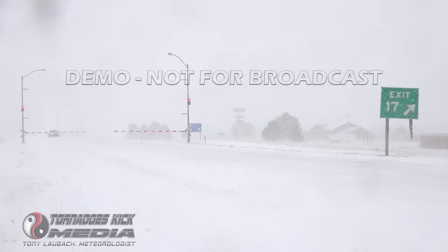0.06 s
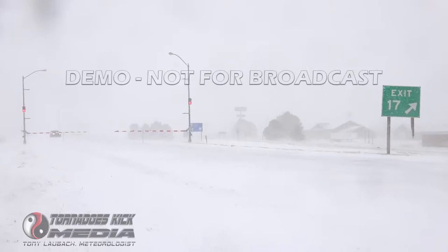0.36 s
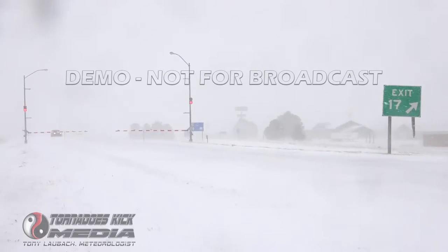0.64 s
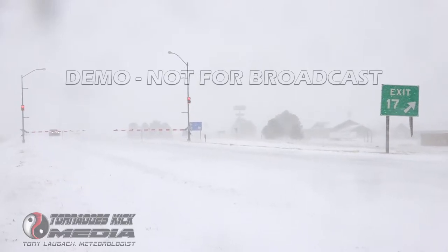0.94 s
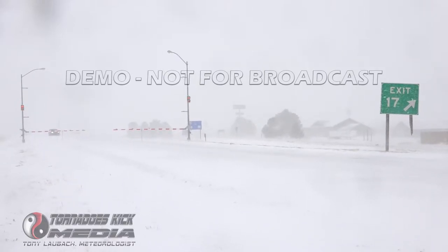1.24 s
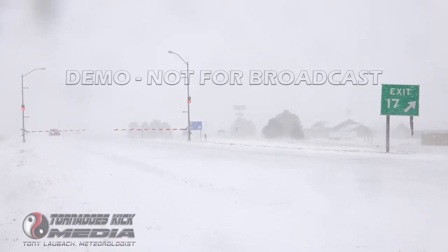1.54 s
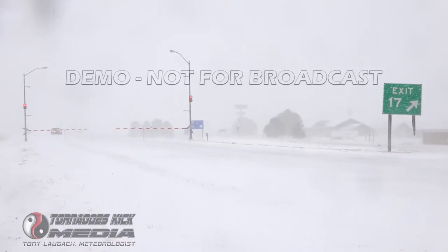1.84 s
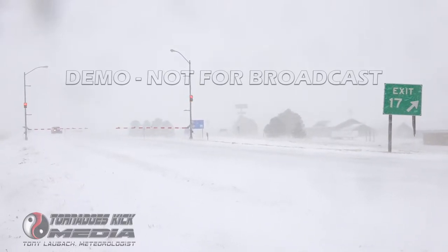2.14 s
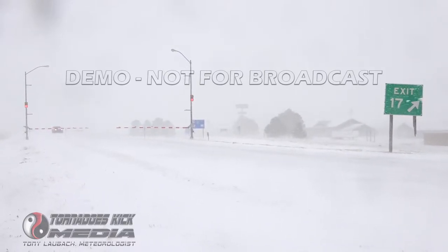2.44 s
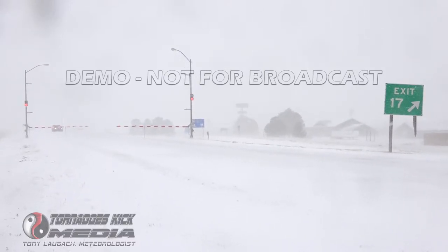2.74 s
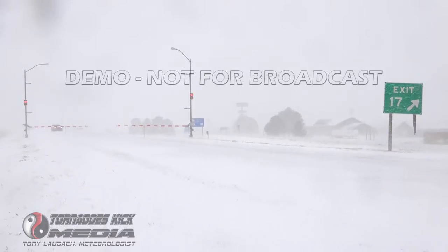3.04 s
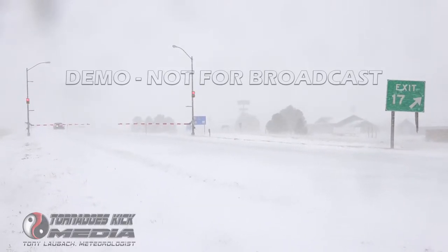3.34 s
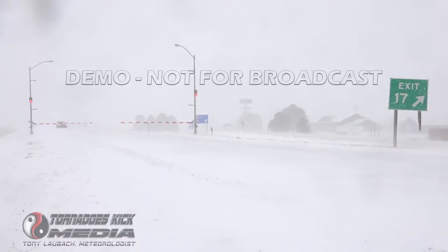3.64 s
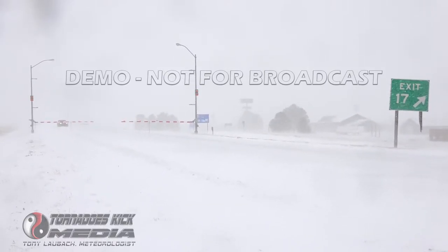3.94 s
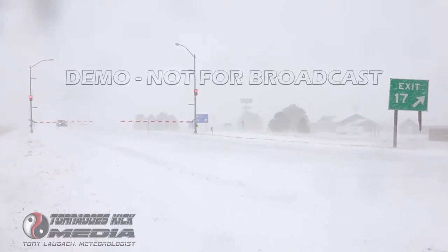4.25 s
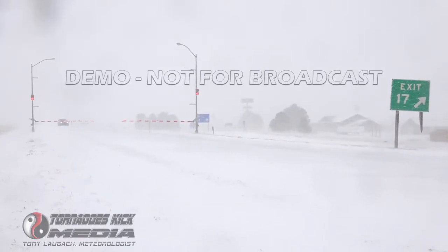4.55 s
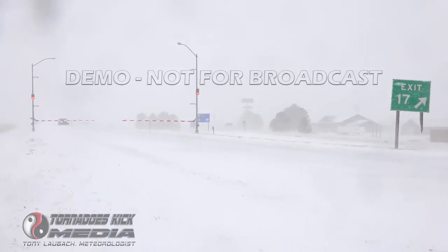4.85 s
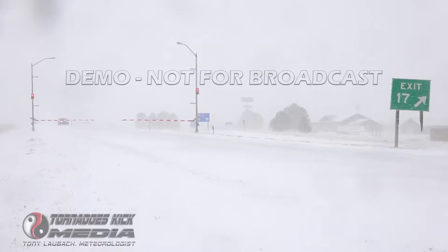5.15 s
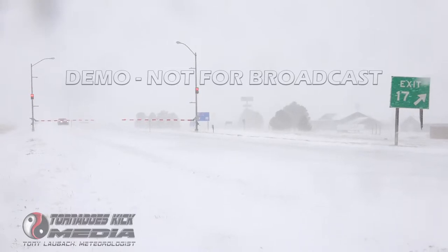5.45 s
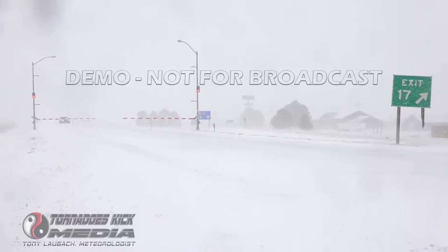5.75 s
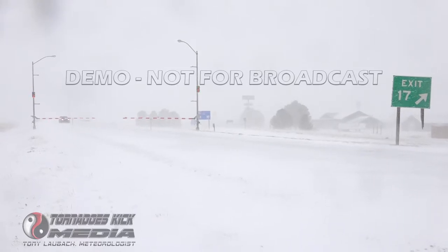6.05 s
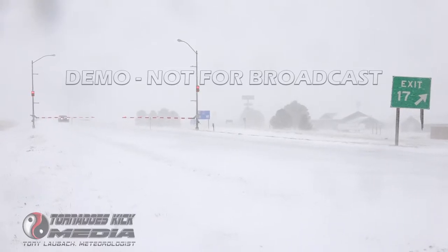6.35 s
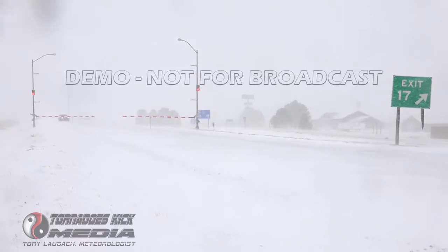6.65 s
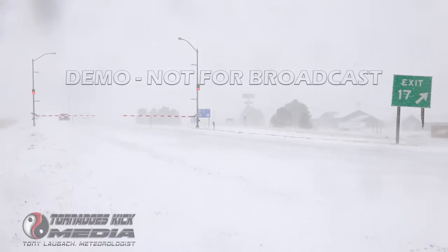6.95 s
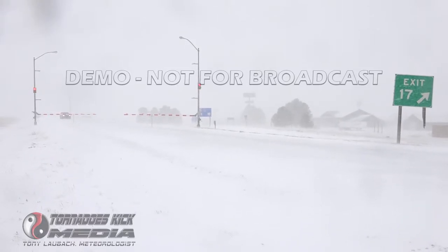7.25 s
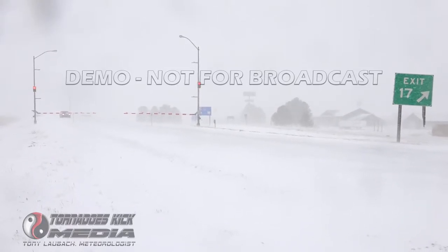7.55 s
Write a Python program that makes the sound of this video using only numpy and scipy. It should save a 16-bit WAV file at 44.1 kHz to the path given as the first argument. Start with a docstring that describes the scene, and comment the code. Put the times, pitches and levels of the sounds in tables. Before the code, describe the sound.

Strong, gusty wind rumbles and slaps against the microphone in a snowstorm, while blown snow lightly ticks and sizzles.

```python
"""A lumpy wind rumble, with gusts of roar and hiss: a blizzard blowing over a camera in the open.
Eddies buffet and slap the microphone, nearly alike in both channels and stronger on the right.
Air roars past the housing, whooshes at its edge, and spits and rasps through the grille.
Driven snow ticks on the housing and fine snow dust sizzles."""
import sys
import numpy as np
from scipy.fft import rfft, irfft, next_fast_len
from scipy.io import wavfile
from scipy.ndimage import uniform_filter1d, minimum_filter1d, map_coordinates

SR = 44100
rng = np.random.default_rng(int(sys.argv[2]) if len(sys.argv) > 2 else 0)


def dump(signal):
    """Clip the signal to [-1, 1] and save it as 16-bit WAV at the path in sys.argv[1]."""
    limited = np.clip(np.atleast_2d(signal).T, -1, 1)
    pcm = np.round(limited * 32767).astype(np.int16)
    wavfile.write(sys.argv[1], SR, pcm)


N = 334719
TIME = np.arange(N) / SR

# Slaps of air. Each row: start in seconds, relative level in dB, nominal pitch in Hz.
SLAP_EVENTS = [(0.325, -14.5, 530), (0.401, -6.5, 243), (0.513, -14, 447), (0.554, -11.5, 520),
               (0.629, -5, 250), (0.783, -9, 400), (1.046, -5.5, 205), (1.367, -2, 244), (1.388, -7.5, 474),
               (1.652, -9.5, 266), (1.8, -3.5, 212), (2.051, -6.5, 128), (2.275, -7.5, 209),
               (2.474, -8.5, 172), (3.083, -5, 192), (3.866, -5, 201), (4.009, -5, 298), (4.448, -4.5, 203),
               (4.481, -4, 201.5), (4.716, -10, 460), (5.19, -4.5, 244), (5.212, -7, 630),
               (5.317, 2.5, 170), (5.875, -3, 153), (6.107, -4.5, 204), (6.713, -11, 500),
               (7.21, -9.5, 530)]


def amp(db):
    """Decibels to gain."""
    return 10 ** (np.asarray(db) / 20)


def unit(x):
    """Scale to rms 1."""
    return x / np.sqrt(np.mean(x ** 2) + 1e-20)


def along(points, hz):
    """Read (Hz, value) points on a log frequency axis."""
    knots_hz, values = np.transpose(points)
    return np.interp(np.log(hz + 1), np.log(knots_hz + 1), values)


def curve(points):
    """Read (seconds, value) points at every sample."""
    return np.interp(TIME, *np.transpose(points))


def bump(centre_s, sigma_s):
    """Bell of height 1."""
    return np.exp(-0.5 * ((TIME - centre_s) / sigma_s) ** 2)


def wobble(rate_hz):
    """Smooth random curve with knots at rate_hz."""
    return map_coordinates(rng.standard_normal(size=8192), [TIME * rate_hz], mode="wrap")


def filtered(x, response):
    """Apply a gain given as a function of Hz."""
    size = next_fast_len(N + SR // 2)
    return irfft(rfft(x, size) * response(np.fft.rfftfreq(size, 1 / SR)), size)[..., :N]


def coloured(x, spectrum):
    """Shape x by (Hz, dB) points; rms 1."""
    return unit(filtered(x, lambda hz: amp(along(spectrum, hz))))


def levelled(x, hold_s):
    """Even out power over hold_s, keeping shorter lumps; rms 1."""
    width = max(int(hold_s * SR), 2)
    power = uniform_filter1d(uniform_filter1d(x ** 2, width), width)
    return unit(x / np.sqrt(np.abs(power) + 1e-9))


def turbulence(spectrum, lump_db, lump_hz, hold_s):
    """Pressure noise in short lumps; rms 1."""
    lumps = rng.standard_normal(N) * amp(lump_db * wobble(lump_hz))
    return levelled(coloured(lumps, spectrum), hold_s)


def gust(start_s, length_s, release_s, attack_s=0.046):
    """Attack, hold and release, 0 to 1."""
    return np.clip(np.minimum((TIME - start_s) / attack_s, 1 - (TIME - start_s - length_s) / release_s), 0, 1)


def weather():
    """Rumble, flutter, roar and hiss in dB: surges lift the low two, gusts the high two, lulls drop all."""
    # Base wind. Each row: time in seconds, strength in dB.
    wind = [(0, -2.5), (.5, -3.5), (1.1, -0.5), (2.1, 1), (4.8, -0.03), (7.59, 1.82)]
    # Pressure surges. Each row: centre and sigma in seconds, rumble and flutter change in dB.
    surges = [(0.736, 0.29, 4, 4), (1.121, .06, -3, 3.5), (1.801, 0.043, 5.5, 7.5), (2.15, 0.05, 6, 2),
              (2.46, 0.094, 4, -1), (2.835, 0.049, 4, 4.5), (3.103, 0.094, 5.5, 2), (3.47, 0.063, 5.5, 5),
              (4.38, 0.16, 5, 1.5), (5.323, 0.23, 3, 3.5), (6.232, 0.076, 3, 3), (6.499, 0.037, 4, 2.5),
              (6.809, 0.064, 3, 2.5), (7.302, 0.097, 4.5, 2)]
    # Gusts. Each row: start, length and release in seconds, roar and hiss change in dB.
    gusts = [(-.06, 0.45, 0.28, 1.5, -0.5), (0.74, 0.19, .08, 2, 0.5), (1.053, .22, 0.056, 2.5, 3),
             (1.339, 0.3, 0.062, 2, 1), (1.706, 0.13, 0.066, 3, 1.5), (2.033, .3, 0.091, 3, 6.5),
             (2.438, 0.085, 0.089, 3, 6.5), (2.752, .145, 0.022, 6, 10.5), (3.247, 0.29, 0.19, 5.5, 6.5),
             (3.95, .42, 0.27, 2.5, 5), (5.056, 0.28, 0.1, 4.5, 6.5), (5.361, 0.22, 0.19, 2.5, 6),
             (6.046, .33, 0.047, 4.5, 6), (6.53, 0.28, .05, 0, 5), (7.112, 0.8, 0.055, 1.5, 4)]
    # The flow lets go. Each row: centre and sigma in seconds, unweighted drop in dB.
    lulls = [(0.472, 0.014, 6), (0.953, 0.039, 3), (1.986, 0.037, 2.5), (2.984, 0.059, 3.5),
             (4.827, 0.052, 1.1), (5.984, 0.014, 8), (6.398, 0.028, 3), (7.044, 0.043, 2)]
    # Weights of that drop for rumble, flutter, roar and hiss.
    lull_weights = (1.74, 0.98, 0.75, 0.6)
    lull_db = sum(db * bump(s, sigma_s) for s, sigma_s, db in lulls)
    surge_db = sum(np.outer(db, bump(s, sigma_s)) for s, sigma_s, *db in surges)
    gust_db = sum(np.outer(db, gust(s, length_s, release_s)) for s, length_s, release_s, *db in gusts)
    base_db = np.array([[-23], [-23.5], [-31.5], [-52.5]]) + curve(wind)
    return base_db + np.vstack([surge_db, gust_db]) - np.outer(lull_weights, lull_db)


def buffeting(rumble_db, flutter_db, eddies):
    """Each eddy is one broad puff, heard in rumble and flutter at once; the largest heave below."""
    # Heave of the largest eddies. Each row: time in seconds, relative level in dB.
    swell = [(0.0, -26), (0.55, -27), (0.9, -36), (1.08, -29), (1.39, -31.5), (1.95, -31), (2.12, -25.5),
             (2.42, -27), (2.6, -32), (3.25, -32.5), (3.62, -19.5), (3.83, -35), (4.3, -19), (4.95, -34.5),
             (5.5, -22.5), (6.85, -26), (7.1, -26), (7.4, -22), (7.59, -21.5)]
    # Spectra of the three bands. Each row: frequency in Hz, relative level in dB.
    heave_spectrum = [(15, -24.5), (30, -14), (45, -6), (65, 5), (90, 6), (130, 3.5), (300, -80)]
    rumble_spectrum = [(40, -45.5), (75, -10), (105, -1), (145, 3), (185, -4.5), (230, -12.5), (330, -25.5),
                       (1000, -85.5)]
    flutter_spectrum = [(120, -34.5), (185, -0.5), (235, 1), (300, -0.5), (400, -5), (500, -7),
                        (700, -22.5), (1200, -27), (4000, -89.5)]
    heave = amp(curve(swell) - 1) * turbulence(heave_spectrum, lump_db=4.5, lump_hz=22, hold_s=0.08)
    puffs = rng.standard_normal(N) * amp(2.53 * np.minimum(wobble(65), 1.3) + 1.58 * wobble(220))
    rumble = amp(rumble_db + 1.05 * eddies) * levelled(coloured(puffs, rumble_spectrum), hold_s=0.086)
    flutter = amp(flutter_db + 1.65 * eddies) * levelled(coloured(puffs, flutter_spectrum), hold_s=0.051)
    return heave + rumble + flutter


def slaps(rise_cycles):
    """An eddy breaks on the port: a push and a suck, over in a few cycles; small eddies smack higher."""
    out, t = np.zeros(N + SR), np.arange(SR // 10) / SR
    for s, db, hz in SLAP_EVENTS:
        age = t * hz / rise_cycles
        swing = np.sin(2 * np.pi * hz * np.exp(0.12 * rng.standard_normal()) * t)
        out[round(s * SR):][:len(t)] += amp(db - 4.5) * age * np.exp(1 - age) * swing
    return out[:N]


def slack(drop_db, sigma_s):
    """Gain of the flow as it slackens just before each slap."""
    return amp(-drop_db * sum(bump(s - sigma_s, sigma_s) for s, *_ in SLAP_EVENTS))


def roar(roar_db, eddies, tearing):
    """Air tears past the housing in quick flutters, swaying with the eddies."""
    # Roar spectrum. Each row: frequency in Hz, relative level in dB.
    spectrum = [(200, -34), (400, 2.5), (580, 7.5), (720, 2.5), (920, -0.5), (1200, 0), (1600, -7),
                (2100, -11.5), (3000, -19.5), (4800, -27.5), (7000, -46), (14000, -61)]
    flow = turbulence(spectrum, lump_db=1.8, lump_hz=170, hold_s=0.089)
    return amp(roar_db) * unit(flow * amp(0.87 * eddies + 0.61 * tearing))


def whooshes():
    """Vortices shed from an edge sound briefly in a band of noise."""
    # Each row: centre in seconds, pitch in Hz, half width over pitch, level in dB, sigma in seconds.
    vortices = [(0.84, 620, 0.26, -33, 0.11), (1.108, 730, 0.26, -22, 0.017), (1.47, 513, .23, -27.5, 0.15),
                (2.306, 780, 0.25, -22, 0.0086), (3.352, 1440, 0.25, -27.5, 0.009),
                (3.5, 523, 0.3, -22.5, 0.018), (5.26, 780, 0.45, -29.5, 0.05), (5.58, 520, .25, -29, .05),
                (6.346, 1370, 0.33, -28, 0.038), (6.78, 1190, 0.4, -28, 0.027),
                (7.262, 640, 0.32, -34.5, .06)]
    out = np.zeros(N)
    for s, hz, width, db, sigma_s in vortices:
        band = filtered(rng.standard_normal(N), lambda f: 1 / (1 + ((f - hz) / (width * hz)) ** 2))
        out += amp(db) * bump(s, sigma_s) * unit(band)
    return out


def hiss(hiss_db, eddies, tearing, pressure, spit_db):
    """Jets through the grille spit at pressure peaks; the highest hiss differs between the ports."""
    # Jet spectrum. Each row: frequency in Hz, relative level in dB.
    spectrum = [(1200, -21), (2500, 8.5), (4000, 6), (5500, 4), (7000, 0.5), (8200, 3), (9000, -5),
                (10000, -8), (13000, -19.5), (15500, -30)]
    # Likeness of the ports. Each row: frequency in Hz, left-right correlation.
    correlation = [(2200, 0.92), (3400, 1), (5000, 0.93), (6800, -0.69), (8200, 0.038), (10000, -0.66),
                   (12000, 0.41)]
    angle = lambda hz: np.arccos(np.clip(along(correlation, hz), -1, 1)) / 2
    noise = rng.standard_normal((2, N))
    mid, side = filtered(noise, lambda hz: np.array([np.cos(angle(hz)), np.sin(angle(hz))]))
    jets = coloured(np.array([mid + side, mid - side]), spectrum)
    push = np.minimum(np.abs(unit(pressure)), 2.5)
    # Weak flow spits; strong flow merges into an even rush.
    fitfulness = np.clip(1.5 - 0.054 * (hiss_db - np.mean(hiss_db)), 0.3, 1.6)
    flicker_db = fitfulness * (0.7 * eddies + 1.8 * wobble(70) + 2.8 * tearing)
    spit = amp(np.minimum(flicker_db, 7.5) + spit_db * push)
    return amp(hiss_db) * jets * levelled(spit, hold_s=0.17)


def rasps(tearing, rise_s, decay_s, rough_db):
    """Bursts of torn air across the grille start fast, hold briefly and die."""
    # Each row: start in seconds, level in dB, hold in seconds.
    bursts = [(0.008, -36.5, .02), (0.196, -33.5, 0.0092), (0.324, -30.5, 0.007), (0.558, -33, 0.028),
              (1.095, -34.5, .038), (1.173, -29, 0.015), (1.215, -29, 0.0084), (1.319, -31, .007),
              (1.385, -28.5, 0.011), (1.841, -34, .025), (2.061, -29, .008), (2.096, -30.5, 0.051),
              (2.286, -31, .02), (2.616, -33, 0.0053), (2.793, -26, 0.022), (2.842, -35, .05),
              (3.571, -34, 0.0088), (4.278, -33, 0.103), (4.517, -34, 0.0092), (5.071, -32, 0.029),
              (5.19, -30, 0.025), (5.245, -32, .045), (6.135, -34, .08), (7.169, -31.5, 0.053)]
    spectrum = [(200, -13), (600, 12.5), (1500, 7.5), (3000, -7.5), (5000, -10), (7000, -26),
                (10000, -23), (15000, -43.5)]
    envelope, t = np.zeros(N + SR), np.arange(SR // 8) / SR
    for s, db, hold_s in bursts:
        shape = (1 - np.exp(-t / rise_s)) * np.exp(-np.maximum(t - hold_s, 0) / decay_s)
        envelope[round(s * SR):][:len(t)] += amp(db) * shape
    torn = rng.standard_normal(N) * amp(rough_db * tearing)
    return envelope[:N] * coloured(torn, spectrum)


def ports(air):
    """The right port gets more of the wind in most bands."""
    # Each row: frequency in Hz, left minus right in dB at full tilt.
    balance = [(30, 2), (70, -1.5), (130, -3.5), (260, -5.5), (600, -6), (1200, -5.5), (2300, -2.5),
               (4500, -3.5), (6200, -3.5), (8100, 8), (10500, -1.5), (15000, 2.5)]
    # Lean of the wind. Each row: time in seconds, multiple of full tilt.
    lean = [(0, 0.58), (1.7, 0.83), (5.2, 1.03), (7.59, 0.92)]
    ratio = lambda hz: amp(along(balance, hz))
    tilt = lambda hz: (ratio(hz) - 1) / (ratio(hz) + 1) * np.array([[1], [-1]])
    return air + curve(lean) * filtered(air, tilt)


def tick(hz, decay_s):
    """One ice grain on the housing: a tiny crack with a damped ring."""
    t = np.arange(SR // 100) / SR
    return np.exp(-t / decay_s) * (np.sin(2 * np.pi * hz * t) + 0.5 * rng.standard_normal(len(t)))


def snow(roar_db, fine_count, fine_db, fine_hz, large_hz):
    """Large grains strike singly; fine ones come harder and more often in gusts."""
    # Each row: time in seconds, level in dB.
    large_grains = [(.071, -46), (.559, -49), (.745, -44), (1.174, -43), (1.365, -44), (1.507, -37.5),
                    (1.702, -49), (1.908, -49), (2.162, -45), (2.489, -44), (2.714, -44), (3.290, -44),
                    (3.457, -40), (5.200, -40), (5.247, -34), (5.566, -39), (5.928, -45), (6.490, -45),
                    (7.059, -47)]
    flux = np.cumsum(np.sqrt(amp(roar_db)))
    times_s = np.interp(rng.random(fine_count), flux / flux[-1], TIME)
    gust_db = 0.5 * np.interp(times_s, TIME, roar_db - np.mean(roar_db))
    levels_db = fine_db + gust_db + 3 * np.minimum(rng.exponential(size=fine_count), 2)
    out = np.zeros((2, N + SR))
    for grains, hz in [(large_grains, large_hz), (zip(times_s, levels_db), fine_hz)]:
        for s, db in grains:
            grain = amp(db) * tick(hz * np.exp(0.13 * rng.standard_normal()), decay_s=0.0005)
            pan_db = rng.normal(0, 1.5)
            out[:, round(s * SR):][:, :len(grain)] += amp([[pan_db], [-pan_db]]) * grain
    return out[:, :N]


def snap(start_s, peak_db, decay_s):
    """The largest grain hits the port itself: one sharp pulse."""
    out, t = np.zeros(N), np.arange(SR // 100) / SR
    out[round(start_s * SR):][:len(t)] = -amp(peak_db) * np.exp(-t / decay_s)
    return out


def snow_dust(hiss_db, gain_db, lift):
    """Dust sizzles on the housing: wisps that grow faster than the hiss, and thick flurries."""
    # Flurries. Each row: centre in seconds, level in dB, half length in seconds.
    flurry_events = [(0.57, -55, 0.0078), (1.112, -47.5, 0.019), (1.18, -49, 0.0098), (1.223, -46, .005),
                     (1.39, -47.5, 0.006), (1.865, -48, .008), (2.372, -51, .035), (2.596, -48, 0.022),
                     (3.45, -46.5, 0.045), (3.568, -45, 0.0065), (3.72, -52, .018), (4.111, -49.5, 0.012),
                     (5.09, -48, 0.0075), (5.207, -43, 0.013), (5.29, -48, 0.043), (5.638, -52, 0.019),
                     (6.197, -50, 0.025), (6.472, -49, 0.018), (7.353, -51.5, .04)]
    spectrum = [(2500, -0.5), (6500, 8), (8500, 5), (10000, -10.5), (14000, -9), (15400, -26)]
    clumps = amp(3.5 * np.minimum(wobble(900), 2))
    dust = clumps * (rng.standard_normal(N) + 0.51 * rng.standard_normal((2, N)))
    wisp_db = gain_db + hiss_db + lift * (hiss_db - np.mean(hiss_db))
    wisps = amp(wisp_db + 4.5 * np.minimum(wobble(190), 1.9))
    flurries = sum(amp(db) * np.exp(-((TIME - s) / half_s) ** 4) for s, db, half_s in flurry_events)
    return (wisps + flurries) * coloured(dust, spectrum)


def scene():
    """Wind and snow; the same eddies sway rumble, roar and hiss."""
    rumble_db, flutter_db, roar_db, hiss_db = weather()
    eddies, tearing = np.clip(wobble(28), -1.3, 1.3), wobble(260)
    flow = buffeting(rumble_db, flutter_db, eddies) + roar(roar_db, eddies, tearing) + whooshes()
    pressure = flow * slack(drop_db=2, sigma_s=0.0058) + slaps(rise_cycles=0.89)
    air = pressure + hiss(hiss_db, eddies, tearing, pressure, spit_db=2.5)
    air += rasps(tearing, rise_s=0.0016, decay_s=0.0045, rough_db=3)
    grains = snow(roar_db, fine_count=190, fine_db=-51.5, fine_hz=8500, large_hz=10300)
    grains += snap(start_s=5.247, peak_db=-12, decay_s=0.0002)
    return ports(air) + grains + snow_dust(hiss_db, gain_db=-11.5, lift=0.1)


def record(dry):
    """The camera ducks its gain around the strongest blows and cuts off above its band limit."""
    ceiling_db, hold_s, top_hz = -2.5, 0.008, 15800
    width = int(hold_s * SR)
    needed_gain = np.minimum(1, amp(ceiling_db) / (np.abs(dry).max(axis=0) + 1e-9))
    limited = dry * uniform_filter1d(minimum_filter1d(needed_gain, width), width)
    return filtered(limited, lambda hz: 1 / np.sqrt(1 + (hz / top_hz) ** 200))


dry = scene()
out = record(dry)
dump(out)
```